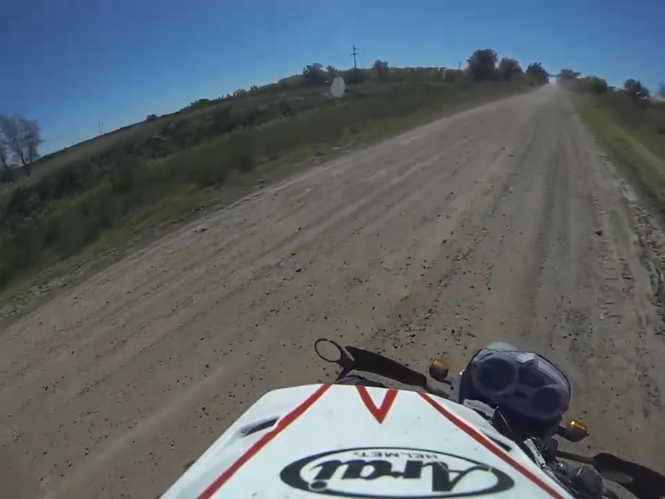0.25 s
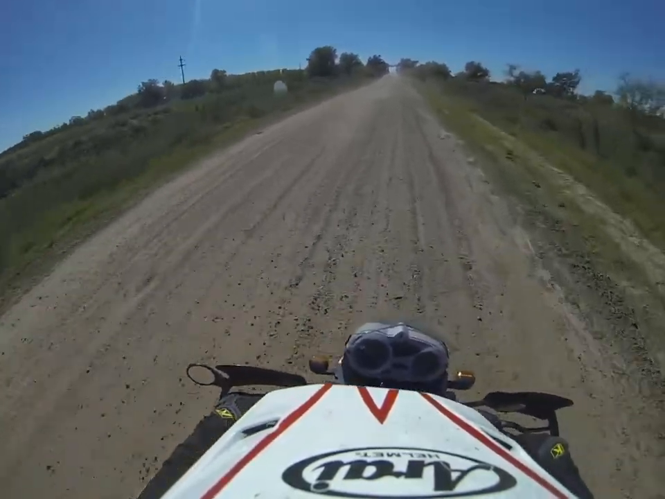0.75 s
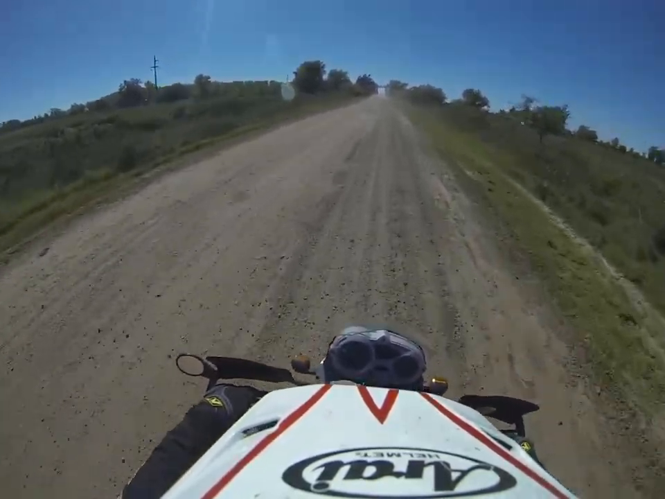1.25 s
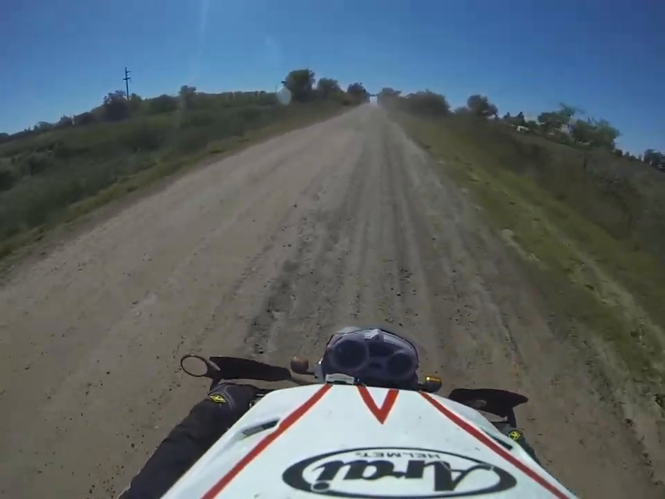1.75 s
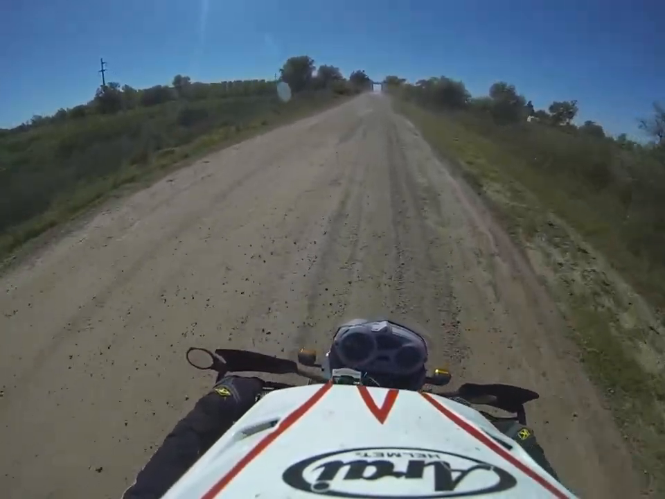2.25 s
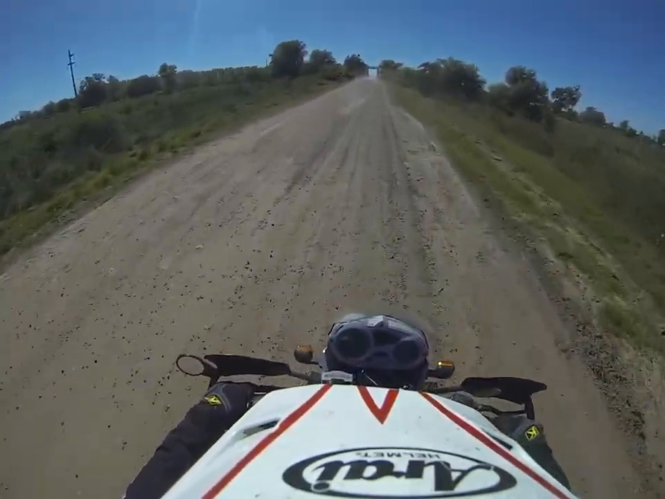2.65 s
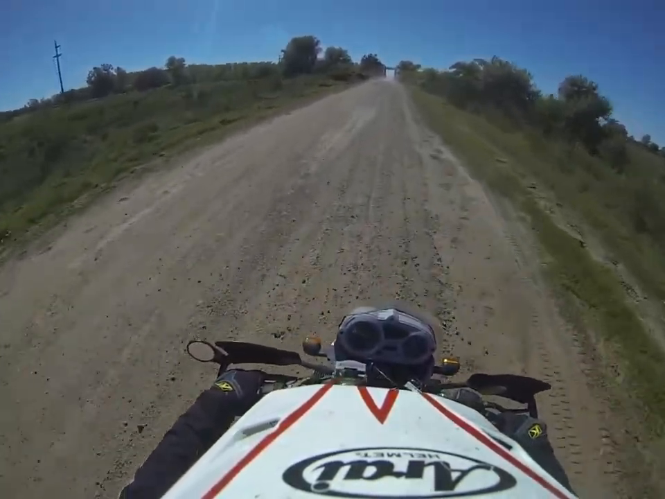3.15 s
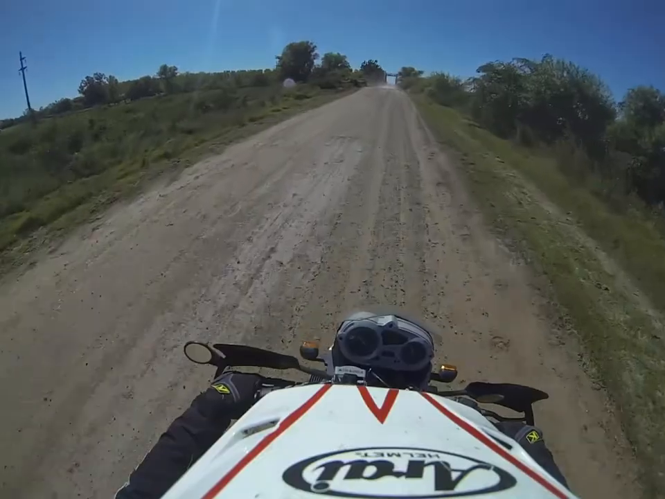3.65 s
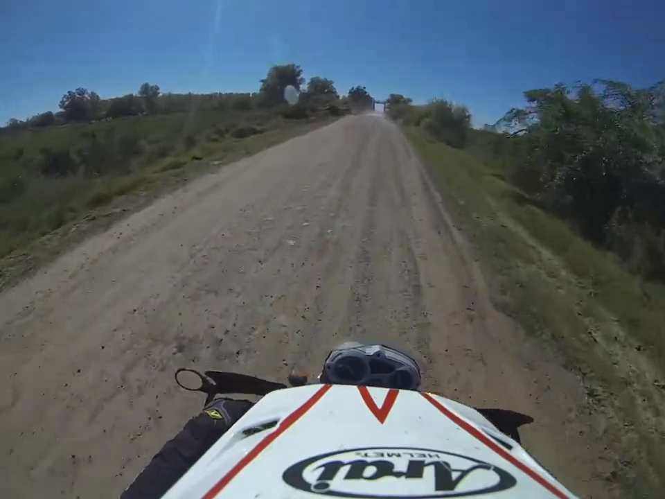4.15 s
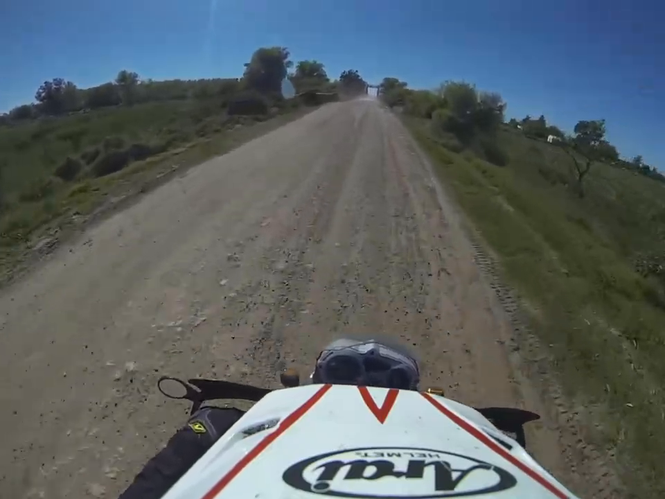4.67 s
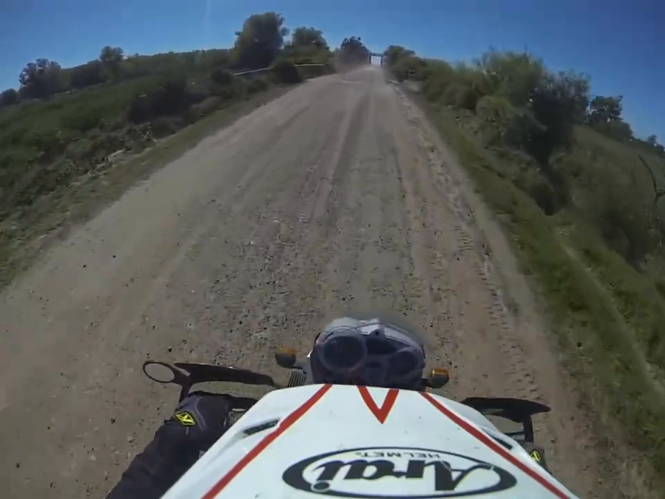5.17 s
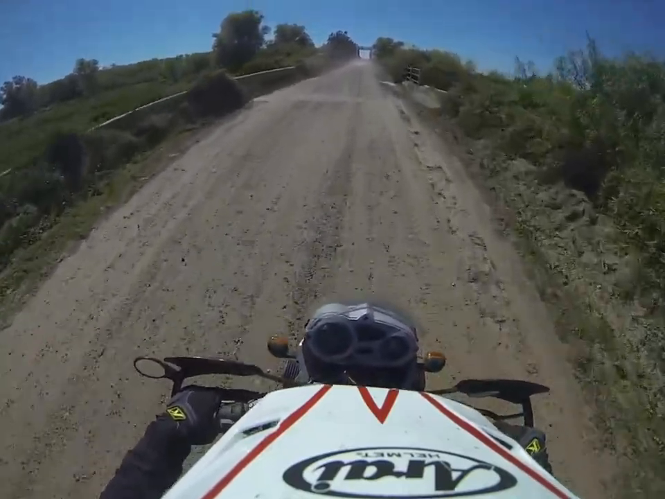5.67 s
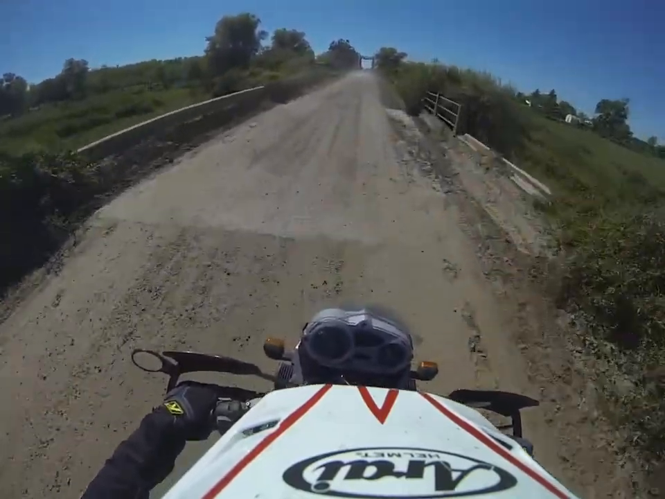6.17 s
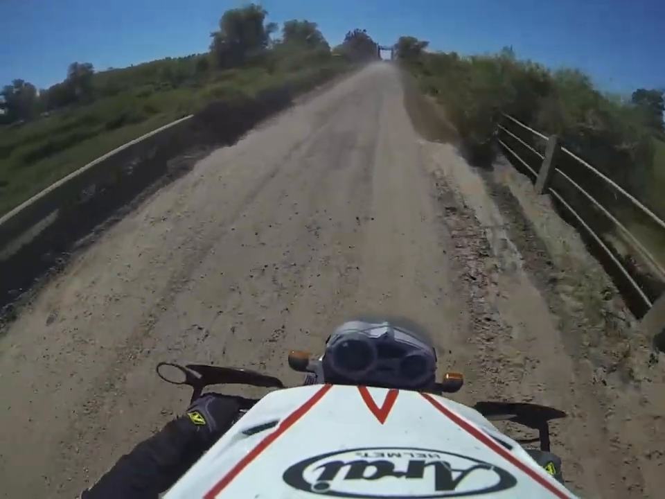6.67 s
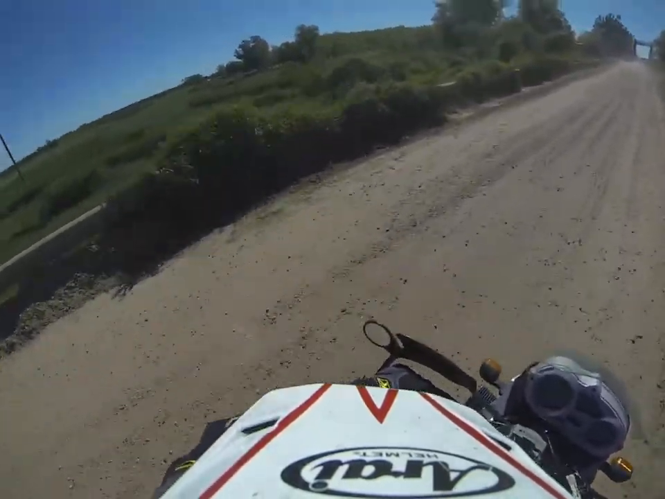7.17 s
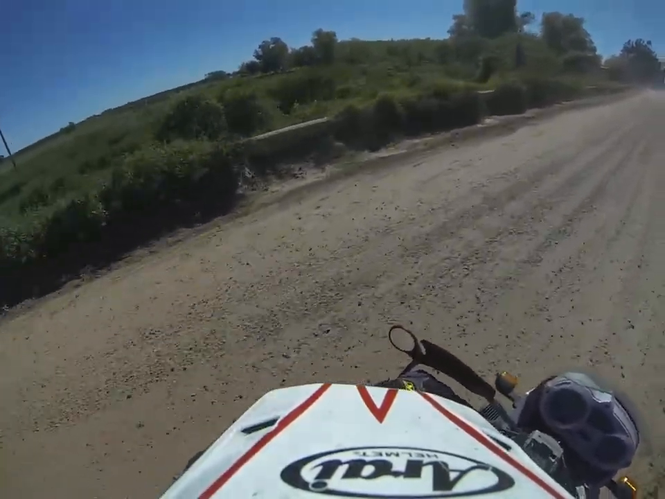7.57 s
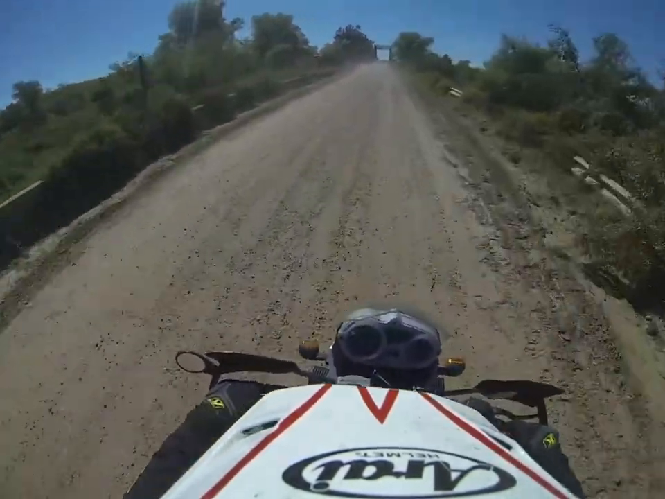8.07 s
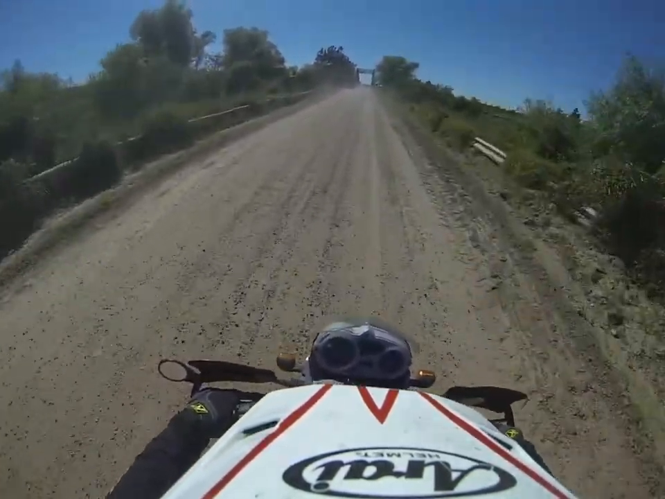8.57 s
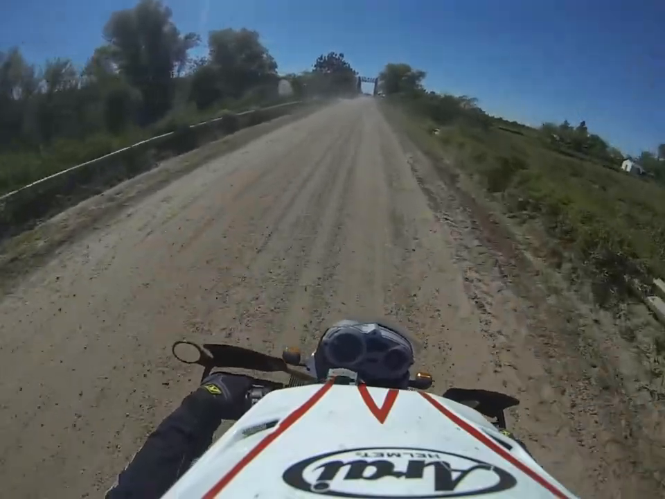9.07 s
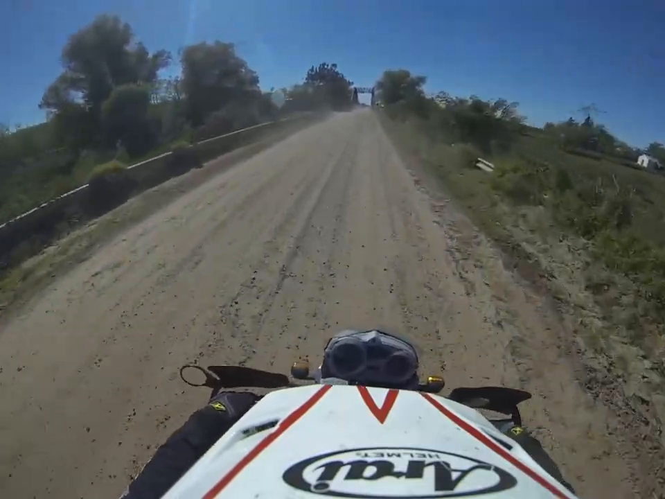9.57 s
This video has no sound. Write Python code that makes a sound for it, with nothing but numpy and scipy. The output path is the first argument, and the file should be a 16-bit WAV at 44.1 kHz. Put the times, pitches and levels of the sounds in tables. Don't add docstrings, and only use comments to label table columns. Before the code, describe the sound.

Low, fluttering wind presses on a cased helmet microphone while a one-cylinder motorcycle chugs over gravel outdoors. After a strong pull around three seconds, the throttle closes; valve ticks, hum and chain clacks come forward, with a little volley of stones at five seconds. The wind eases, the bark returns, and the engine climbs towards the end with fresh gusts.

```python
import sys
import numpy as np
from scipy import signal
from scipy.fft import rfft, irfft, next_fast_len
from scipy.io import wavfile
from scipy.ndimage import uniform_filter1d

SR = 44100
rng = np.random.default_rng(int(sys.argv[2]) if len(sys.argv) > 2 else 0)


def persist_wave(psi):
    counts = np.round(np.clip(psi, -1, 1) * 32767).astype(np.int16)
    wavfile.write(sys.argv[1], SR, np.atleast_2d(counts).T)


def volts_from_decibels(level):
    exponent = np.asarray(level, float) / 20
    return 10 ** exponent


N = 433062
TIME = np.arange(N) / SR

# time in seconds, level in dB.
AIRFLOW = [(0, -3.5), (.27, -3), (.55, -5), (.9, 2.5), (2.7, -0.5), (4.16, -0.5), (4.26, -2.5),
           (5.06, -3.5), (5.17, -12), (6.26, -9.5), (6.42, -11.5), (6.76, -5), (7.77, -2.5), (7.85, -5.5),
           (8.12, -7.5), (8.23, 2), (9.82, 0.3)]
WIND_DB = [-17, -22.5, -35.5, -63.5]
FLOW_SHARE = [.05, .55, 0.699, 1.01]
EDDY_SHARE = [0.36, 0.82, 0.71, 0.45]
# centre in seconds, level in dB, length in seconds.
EDDIES = [(0.0, -6, 0.24), (.38, -3.5, 0.052), (.49, 3, 0.014), (.63, -10, 0.073), (.76, -4, 0.51),
          (.93, 8, 0.24), (1.02, -4.5, 0.33), (1.75, -6, 0.11), (2.15, -3.5, 0.11), (2.79, -7, 0.11),
          (2.92, -6.5, 0.1), (2.97, -3.5, .06), (3.42, 1, .2), (4.16, -2, .12), (4.54, -11, 0.075),
          (4.87, -1, 0.12), (5.14, -4.5, 0.1), (5.52, -9, 0.075), (5.61, -2, 0.12), (5.77, 4, 0.077),
          (6.37, -10, 0.12), (6.63, -3, .12), (6.93, -1.5, .14), (7.15, 4, .1), (7.25, -5, 0.048),
          (7.3, 3.5, 0.19), (7.38, -2.5, 0.069), (7.44, 3, 0.082), (7.79, 3, 0.11), (8.17, -5, 0.099),
          (8.3, 0, 0.16), (8.42, -7, 0.14), (9.0, 5, 0.11), (9.04, -3.5, 0.06), (9.11, 8, .06),
          (9.14, -6.5, 0.19), (9.35, 0.5, 0.13), (9.57, -5, 0.03)]
# centre in seconds, level in dB.
SHOVES = [(.57, 3), (1.4, 0.5), (1.7, 3), (2.64, 2), (2.88, 3.5), (4.48, 2), (4.7, -1), (5.501, 9),
          (5.61, 3), (5.72, 2.5), (6.29, 7.5), (6.94, -6.5), (7.438, -1), (7.759, -7), (7.85, 3.5),
          (8.1, 0), (8.371, 0.5), (8.8, -0.5), (9.0, 2.5), (9.74, 2)]
# frequency in Hz, density in dB per Hz.
CASE_TONE = [(18, -3), (43, -3.5), (92, -6.5), (141, -12.5), (267, -17.5), (400, -22), (934, -25),
             (1370, -35.5), (1800, -28.5), (2280, -39), (3200, -44), (4200, -53), (6400, -62.5),
             (7200, -75.5)]
# frequency in Hz, width in Hz, level in dB.
PORT = [(8540, 630, -5), (10660, 370, -4)]
# time in seconds, peak in dB.
SLAPS = [(0.928, -19), (2.155, -20.5), (2.722, -12), (3.348, -14.5), (4.788, -13), (5.101, -16),
         (5.134, -16.5), (5.238, -10), (5.375, -9.5), (5.479, -16.5), (6.103, -15.5), (7.176, -12),
         (7.217, -13), (7.443, -1), (7.455, -5.5), (7.629, -13), (7.738, -14.5), (8.392, -14.5),
         (8.612, -15), (8.753, -15.5), (8.896, -12)]
# time in seconds, peak in dB, ring in Hz.
GRIT = [(0.682, -36.5, 2450), (1.2316, -28, 2330), (2.391, -33, 2640), (2.4613, -23, 2500),
        (3.4595, -19.5, 2400), (3.9933, -45, 2610), (4.03, -32.5, 2430), (4.0694, -32, 3090),
        (4.1265, -30.5, 2390), (4.141, -24, 2430), (4.1897, -24.5, 2360), (4.5094, -43, 2340),
        (4.8359, -30.5, 2340), (5.462, -35, 2550), (5.6989, -43, 2400), (5.7124, -31, 2560),
        (5.7827, -25.5, 2300), (5.9379, -37, 2590), (6.3684, -32.5, 2320), (6.4317, -33, 2640),
        (7.6985, -30, 2360), (8.1633, -28, 2470), (8.4706, -25, 2780), (8.967, -31, 2570),
        (9.0813, -32, 2520), (9.5332, -24.5, 2500)]
# time in seconds, peak in dB, ring in Hz.
STONES = [(0.256, -26.5, 2370), (0.9703, -32, 2660), (2.0876, -33, 2510), (2.5427, -26, 2480),
          (3.3632, -25, 2350), (4.055, -29, 2450), (4.8793, -28, 2500), (4.96, -44, 2980),
          (4.981, -27.5, 2420), (5.013, -24.5, 2580), (5.0528, -28, 2400), (5.1022, -28.5, 2320),
          (5.129, -54, 2650), (5.617, -34, 2530), (5.8182, -33, 2500), (6.0467, -36, 2466),
          (6.075, -30, 2410), (6.6807, -39, 2430), (7.212, -35, 2560), (8.2383, -35, 2440),
          (8.817, -23.5, 2400), (9.336, -36.5, 2980), (9.8009, -41, 2590)]
# time in seconds, level in dB.
CHIPS = [
    (4.33, -61),
    (4.71, -61),
    (4.985, -59),
    (5.045, -45.5),
    (5.075, -49.5),
    (6.95, -59),
    (7.13, -58),
    (7.27, -60),
    (8.215, -58.5),
    (9.805, -41),
]
# time in seconds, peak in dB.
CLACKS = [(0.285, -24), (0.3067, -21), (0.5337, -29), (3.4203, -24), (3.4933, -27.5), (3.914, -18),
          (4.0538, -23), (4.2645, -15), (4.345, -22), (4.385, -21.5), (4.4243, -19.5), (4.6287, -16),
          (4.6673, -26), (4.7102, -23), (4.794, -19.5), (4.8812, -27), (5.012, -21), (5.1023, -24),
          (5.1992, -28.5), (5.3745, -29.5), (5.46, -25), (5.6575, -35), (5.7698, -31), (5.9408, -23.5),
          (6.111, -22), (6.2282, -34), (6.4298, -28.5), (6.6804, -20), (6.9118, -29), (7.3332, -32.5),
          (7.5083, -36.5), (7.712, -19), (7.7867, -15), (7.8966, -27), (8.079, -24), (8.237, -19),
          (8.2791, -20), (8.754, -24), (8.7963, -16.5), (8.8952, -24), (9.0077, -23), (9.214, -32),
          (9.3127, -21.5), (9.4177, -28.5), (9.5013, -25)]
# time in seconds, firings a second in Hz.
FIRING = [(0.0, 28.059), (1.3, 28.18), (2.0, 26.582), (2.6, 26.545), (3.5, 27.376), (3.9, 26.21),
          (4.3, 24.995), (5.1, 23.669), (5.5, 24.208), (5.85, 24.559), (6.15, 24.651), (6.45, 24.763),
          (6.7, 25.332), (6.95, 25.557), (7.3, 26.33), (8.15, 27.72), (8.4, 27.852), (9.82, 28.655)]
# time in seconds, throttle from 0 to 1.
THROTTLE = [(0, 0.25), (2.55, 0.11), (2.8, 0.52), (3.5, 0.8), (3.8, 0.05), (5.2, 0.14), (5.45, 0.53),
            (6.15, 0.77), (6.4, 0.4), (6.8, 0.7), (7.1, 0.91), (7.75, 0.95), (8.0, 0.53), (8.5, 0.98),
            (9.0, 0.95), (9.2, 0.39), (9.5, 0.53), (9.82, 0.17)]
# time in seconds, shift in
BARK_SHIFT = [(2.7, -.018), (3.05, -.004), (3.45, 0), (3.65, -.014), (3.8, 0), (5.1, 0), (5.25, -.025),
              (5.6, .008), (6.25, -.006), (7.05, -.008), (7.5, .003), (8.1, -.016), (8.36, -.018), (8.52, .003),
              (8.78, .01), (8.95, -.012), (9.25, -.026), (9.65, .005)]
# multiple of the firing rate, level in dB.
HUM = [(2, 0.5), (3, -2.5), (4, 4), (5, -4.5)]
# frequency in Hz, width in Hz, level in dB.
HEAD = [(1780, 140, -6.5), (910, 150, 2.5), (3180, 4300, -14.5), (5400, 2100, -8)]
# frequency in Hz, width in Hz, level in dB.
PIPE = [(432, 40, 15), (1240, 228, 6), (712, 100, 11.5), (1445, 166, -5), (995, 160, 7)]
# frequency in Hz, width in Hz, level in dB.
SILENCER = [(235, 70, 34), (274, 36, 36.5)]
# frequency in Hz, width in Hz, level in dB.
THUMP = [(242, 176, 13.5)]
# frequency in Hz, width in Hz, level in dB.
CRACK = [(1760, 480, -10.5)]


def set_rms(x, db):
    return x * volts_from_decibels(db) / np.sqrt(np.mean(x ** 2))


def read(table):
    seconds, values = np.transpose(table)
    return np.interp(TIME, seconds, values)


def bumps(rows):
    return sum(db * np.cos(np.pi * np.clip((TIME - s) / length, -.5, .5)) ** 2 for s, db, length in rows)


def walk(rate):
    hold = max(int(SR / rate), 2)
    steps = np.repeat(rng.standard_normal(N // hold + 1), hold)
    return 0.69 * uniform_filter1d(uniform_filter1d(steps, hold), hold)[:N]


def ring(x, modes):
    out = 0
    for k, (hz, width, db) in enumerate(modes):
        b, a = signal.iirpeak(hz, hz / width, SR)
        out = out + (-1) ** k * volts_from_decibels(db) * signal.lfilter(b, a, x)
    return out


def muffle(x, hz):
    return signal.sosfilt(signal.butter(3, hz, fs=SR, output="sos"), x)


def clicks_at(rows):
    hits = np.zeros(N)
    for s, db in rows:
        hits[int(s * SR)] = volts_from_decibels(db)
    return hits


def puff(clicks, decay_s):
    keep = np.exp(-1 / (decay_s * SR))
    return signal.lfilter([1], [1, -keep], clicks) * rng.standard_normal(N)


def wind_levels():
    flow, eddies = read(AIRFLOW), bumps(EDDIES)
    layers = [db + a * flow + b * eddies for db, a, b in zip(WIND_DB, FLOW_SHARE, EDDY_SHARE)]
    shove_s = 0.15
    layers[0] = layers[0] + bumps([(s, db, shove_s) for s, db in SHOVES])
    return layers


def wind():
    size = next_fast_len(N)
    octave = np.log2(np.maximum(np.arange(size // 2 + 1) * SR / size, 1))
    case_hz, case_db = np.transpose(CASE_TONE)
    tone_db = np.interp(octave, np.log2(case_hz), case_db, left=-60, right=-120)
    air = rfft(rng.standard_normal(size)) * volts_from_decibels(tone_db)
    buffet_db, rush_db, hiss_db, whistle_db = wind_levels()
    gust = 1.2 * walk(18) + 0.67 * walk(5.6) + 2.0 * walk(70) + 1.56 * walk(300)
    # level, lowest and highest octave, gust share, swell in dB, trim in dB
    layers = [(buffet_db, 4, 8, .5, 3.6, -.5), (rush_db, 8, 10.5, 1.05, 1.1, -2.5), (hiss_db, 10.5, 13, 1.1, .9, -.5)]
    out = 0
    for curve_db, low, high, gust_share, swell_db, trim_db in layers:
        group, swell = 0, walk(19)
        for centre in np.arange(low + 0.22, high, .5):
            window = np.cos(np.pi * np.clip(octave - centre, -.5, .5)) ** 2
            band = irfft(air * window, size)[:N]
            shake_db = gust_share * min(centre / 8, 1) ** 3 * gust
            lump_db = swell_db * min(centre / 7, 1) ** 3 * swell
            group = group + band * volts_from_decibels(shake_db + lump_db + 0.72 * walk(9))
        out = out + set_rms(group, trim_db) * volts_from_decibels(curve_db)
    breath = rng.standard_normal(N) * volts_from_decibels(0.76 * gust + 2.0 * walk(7.5))
    whistle = ring(ring(breath, PORT), [(8040, 1500, -0.61), (11140, 570, -0.39)])
    return out + set_rms(whistle, -0.26) * volts_from_decibels(whistle_db)


def knocks():
    per_s = 22
    when, sign, size = rng.random((int(N / SR * per_s), 3)).T
    hits = np.zeros(N)
    hits[(when * N).astype(int)] = np.sign(sign - .5) * volts_from_decibels(9 * size)
    return set_rms(muffle(ring(hits, [(104, 142, 0.5)]), 303), -26.5)


def slaps():
    hits = clicks_at([(s, db + 1.0) for s, db in SLAPS])
    body = [(168, 180, 26.4), (600, 1300, 7.6), (1810, 250, 1.9)]
    return ring(2.7 * hits + 0.29 * puff(hits, 0.0038), body)


def stones(rows):
    out = np.zeros(N)
    t = np.arange(int(.03 * SR)) / SR
    envelope = np.exp(-t / 0.002) * np.minimum(t / 0.0002, 1)
    for s, db, hz in rows:
        burst = rng.standard_normal(len(t)) * envelope
        ping = ring(burst, [(hz, 450, -.5), (1.48 * hz, 700, -4), (1800, 300, -3)])
        ping = volts_from_decibels(db + 1) * ping / np.abs(ping).max()
        i = int(s * SR)
        out[i:i + len(t)] += ping[:N - i]
    return out


def chips():
    return ring(puff(clicks_at(CHIPS), .004), [(10600, 900, 1.5), (12500, 900, -2.5)])


def clacks():
    top_db = -22.5
    hits = clicks_at([(s, min(db, top_db) + 22) for s, db in CLACKS])
    body = [(1770, 270, 4.0), (950, 220, -6), (3300, 3600, -23)]
    return muffle(ring(0.6 * hits + 0.29 * puff(hits, 0.0022), body), 3300)


def beats(phase, at, jitter_s, scatter_db):
    count = np.arange(1, int(phase[-1]) - 1)
    late, size = rng.standard_normal((2, len(count)))
    when = np.interp(count + at, phase, TIME) + jitter_s * late
    out = np.zeros(N)
    out[(when * SR).astype(int)] = volts_from_decibels(scatter_db * size)
    return out


def engine_hum(phase):
    hum = 0
    for multiple, db in HUM:
        tone = np.sin(2 * np.pi * multiple * phase + 1.06 * walk(4.0))
        hum = hum + volts_from_decibels(db + 0.57 * walk(3.9)) * tone
    return hum


def valve_tick(phase):
    valve = beats(phase, .185, 0.00037, 0.9)
    return set_rms(ring(1.3 * valve + puff(valve, 0.0023), HEAD), -34.5)


def pipe(pulses, firing_hz):
    cool_hz, hot_hz, cool_scale = 24.5, 26.3, .95
    hot = np.clip((firing_hz - cool_hz) / (hot_hz - cool_hz), 0, 1)
    cool_pipe = [(cool_scale * hz, width, db) for hz, width, db in PIPE]
    return ring(hot * pulses, PIPE) + ring((1 - hot) * pulses, cool_pipe)


def exhaust(phase, firing_hz):
    bark, bark_at = phase - read(BARK_SHIFT), -.087
    echo_s = .0066 - .000145 * (firing_hz - 26.8)
    first = beats(bark, bark_at, .00005, 0.98)
    second = beats(bark - echo_s * firing_hz, bark_at, .00005, 1.1)
    third, at = np.zeros(N), np.flatnonzero(second)
    third[at + (echo_s[at] * SR).astype(int)] = volts_from_decibels(-8) * second[at]
    pulses = 1.16 * second - first - third
    clean = volts_from_decibels(3.0) * muffle(pipe(pulses, firing_hz) + ring(second, CRACK), 2200)
    boom = volts_from_decibels(-0.5) * ring(-first - 0.39 * second, SILENCER) - ring(first, THUMP)
    rough = ring(puff(0.74 * first + second, 0.0031), [(770, 520, -4.5), (1970, 200, -3.5)])
    return clean + boom + set_rms(muffle(rough, 2100), -38)


def engine():
    firing_hz = read(FIRING)
    phase = .16 + np.cumsum(firing_hz) / SR
    throttle = np.clip(read(THROTTLE), 0, 1.5)
    slack = np.clip(1 - 4.3 * throttle, 0, 1)
    hum = volts_from_decibels(-31 + 10.5 * slack) * engine_hum(phase)
    return hum + slack * valve_tick(phase) + throttle * exhaust(phase, firing_hz)


def scene():
    air = wind() + knocks() + muffle(muffle(slaps(), 1700), 2500)
    gravel = volts_from_decibels(-4.0) * muffle(stones(GRIT), 6200) + muffle(stones(STONES), 5200) + chips()
    bike = clacks() + muffle(engine(), 2260)
    return (air + gravel + bike)[None]


def roll_off(x):
    return signal.sosfilt(signal.butter(12, 12900, fs=SR, output="sos"), x)


def record(dry):
    swing = uniform_filter1d(dry ** 2, int(0.058 * SR), axis=1)
    held = dry * (swing / np.mean(swing)) ** -.12
    rounded = np.tanh(.6 * held) / .6
    return roll_off(rounded)


dry = scene()
out = record(dry)
persist_wave(out)
```